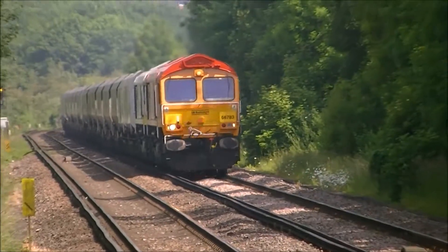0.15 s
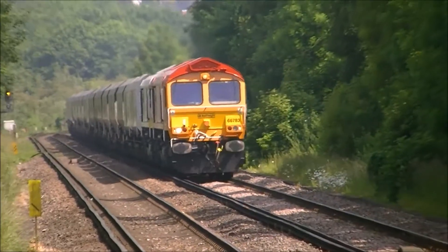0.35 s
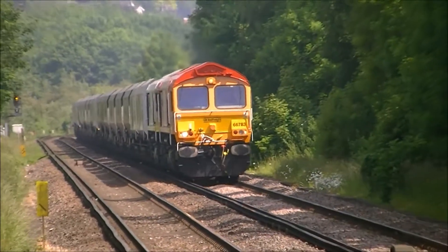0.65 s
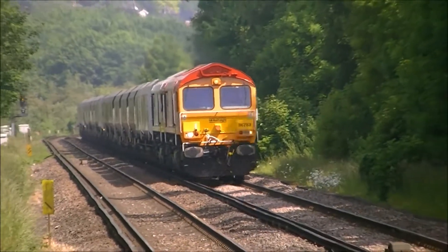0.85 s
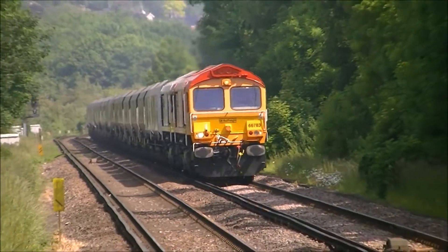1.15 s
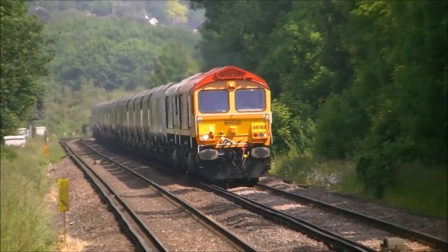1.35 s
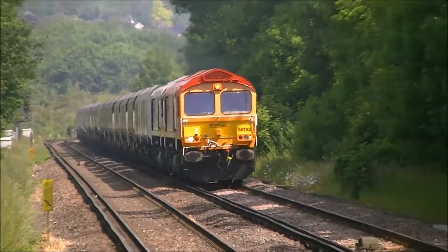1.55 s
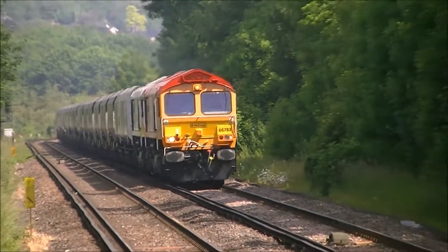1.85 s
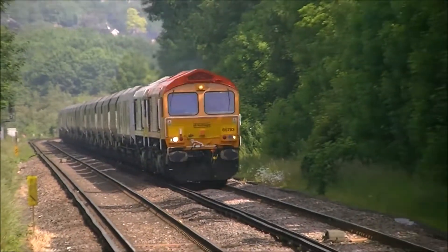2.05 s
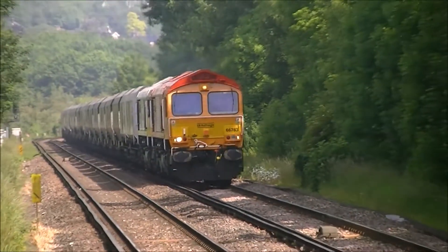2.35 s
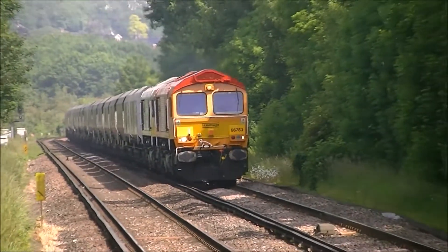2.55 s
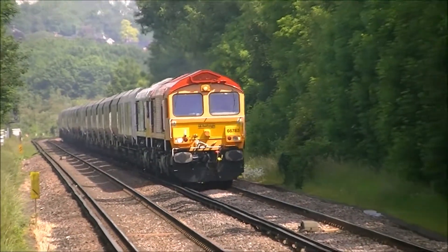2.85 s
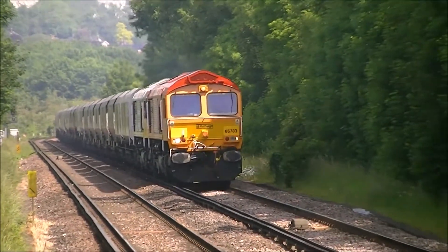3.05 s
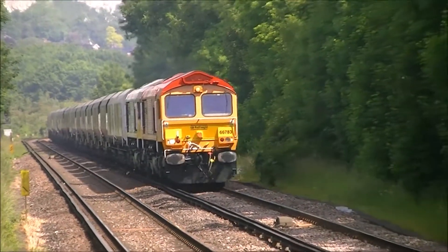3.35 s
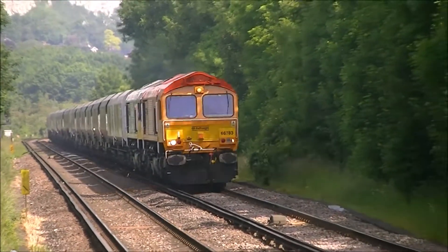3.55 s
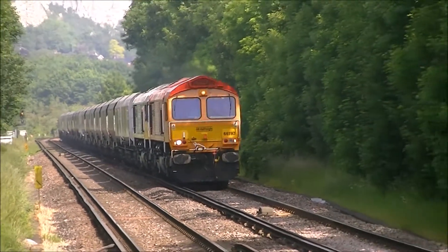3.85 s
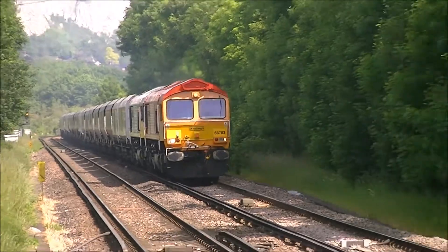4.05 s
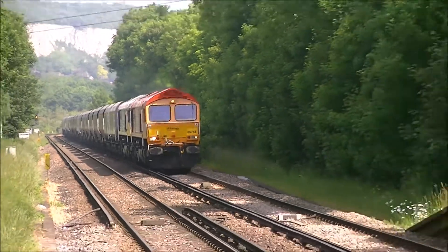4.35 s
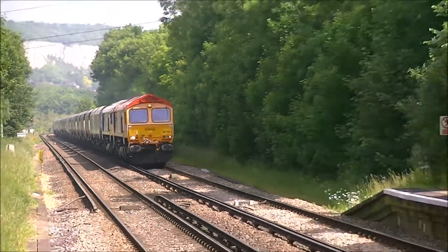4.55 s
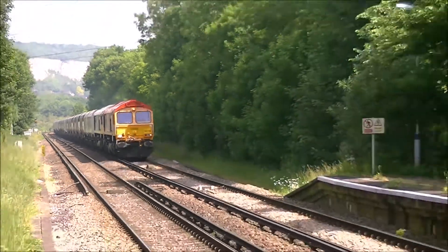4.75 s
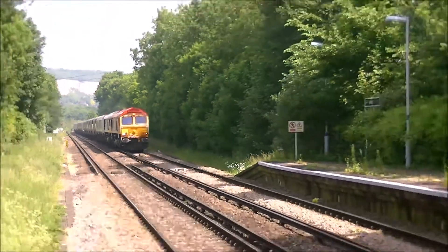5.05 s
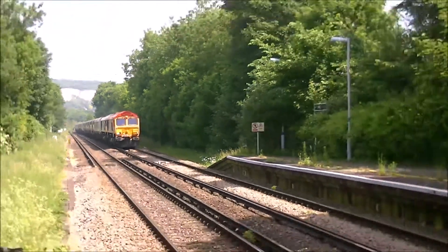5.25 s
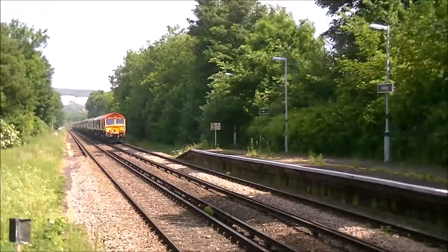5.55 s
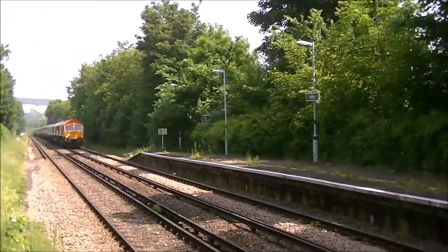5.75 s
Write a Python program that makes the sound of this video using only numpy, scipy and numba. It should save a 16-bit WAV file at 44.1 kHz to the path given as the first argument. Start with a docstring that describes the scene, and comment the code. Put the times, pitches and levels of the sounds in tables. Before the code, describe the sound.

A roughly six-second outdoor stereo take from a country platform. Steady soft leaf and far-traffic noise and very faint high hiss lie under a distant freight train, whose smooth, flickering rolling roar starts quiet and grows throughout, gaining treble as it nears; it never passes. A small bird, slightly right and softened by trees, sings from the start: thin gliding whistles, hooks and low falling syllables, a tiny chip rattle around 1.8-2.0, then a bright rapid trill of nine falling sweeps from 2.5 to 3.3. A few fainter whistles follow until 3.9, then almost nothing. Dry, close cracks occur at 3.5 and, strongest, 4.1, with tiny ticks between. At 5.4 a brassy low horn note blasts, followed at 5.66 by a slightly higher one until about 5.8, each short, rich and buzzy, starting sharp in pitch. They echo off trees about 0.2 seconds later while automatic gain squashes everything.

```python
"""A diesel freight train approaches a country station along a tree-lined cutting, heard from the platform.
From the start its roar, shaped noise, grows over leaves and hiss while a small bird sings gliding whistles.
Very short chips rattle at 1.8 s, falling sweeps trill from 2.5 s, and dry noise ticks crack from 3.5 s.
At 5.4 s a two-tone air horn, two stacks of partials, blasts, echoes off the trees and drives
the camera's gain control down."""
import sys
import numpy as np
from scipy import signal
from scipy.fft import rfft, irfft
from scipy.io import wavfile
from scipy.ndimage import uniform_filter1d, map_coordinates
from numba import njit

SR = 44100
rng = np.random.default_rng(int(sys.argv[2]) if len(sys.argv) > 2 else 0)


def store_pcm(level_fs):
    """Save levels as 16-bit WAV."""
    pcm = np.round(np.clip(level_fs, -1, 1) * 32767).astype(np.int16)
    wavfile.write(sys.argv[1], SR, np.atleast_2d(pcm).T)


N = 259749  # samples, 5.89 s


def undb(db):
    """Decibels to gain."""
    return 10 ** (np.asarray(db) / 20)


def level(x, db):
    """Scale to an rms level."""
    return x * undb(db) / np.sqrt(np.mean(x ** 2))


def shape(x, table):
    """Gain in dB of a (pitch_hz, level_db) table at each frequency bin of x."""
    hz, db = np.transpose(table)
    bin_hz = np.fft.rfftfreq(x.shape[-1], 1 / SR)
    return np.interp(np.log(bin_hz + 1), np.log(hz), db)


def walk(rate):
    """Random levels, each held 1 / rate seconds and smoothed twice; their spread is near 1."""
    hold = int(SR / rate)
    steps = np.repeat(rng.standard_normal(N // hold + 1), hold)
    return 1.09 * uniform_filter1d(uniform_filter1d(steps, hold), hold)[:N]


def pair(side_db):
    """Stereo noise: a part shared by both ears, and a part that is opposite left and right."""
    mid, side = rng.standard_normal((2, N))
    return np.array([mid + undb(side_db) * side, mid - undb(side_db) * side])


def trees(x, gap_s, rise_s, t60_s, damp_hz, wet_db, side_db):
    """Scatter from trunks and leaves: after a gap, noise that swells and dies, duller than the source."""
    t = np.maximum(np.arange(SR) / SR - gap_s, 0)
    tail = pair(side_db)[:, :SR] * (1 - np.exp(-t / rise_s)) * undb(-60 * t / t60_s)
    tail = signal.lfilter(*signal.butter(1, damp_hz, fs=SR), tail)
    tail = tail * undb(wet_db) / np.sqrt(np.sum(tail[0] ** 2))
    return signal.fftconvolve(x[None], tail, axes=1)[:, :N]


def causal(orders, count=256):
    """Phase of each partial when a sharp puff of air rings the bell (minimum phase)."""
    k, db = np.transpose(orders)
    log_gain = np.log(undb(np.interp(np.arange(count + 1) * k[-1] / count, k, db)))
    mirrored = np.r_[log_gain, log_gain[-2:0:-1]]
    phase = -np.imag(signal.hilbert(mirrored))
    return phase[np.round(k * count / k[-1]).astype(int)]


def add(out, rows, orders, fade_s):
    """Add a stack of partials that follows a (time_s, pitch_hz, level_db, treble_loss) curve."""
    s, hz, db, *loss = np.transpose(rows)
    i = np.arange(max(int(s[0] * SR), 0), min(int((s[-1] + fade_s) * SR), N))
    t = i / SR
    phase = 2 * np.pi * np.cumsum(np.interp(t, s, hz)) / SR
    k, gain = np.array(orders)[:, :1], undb(np.array(orders)[:, 1:])
    gain = gain / np.sqrt(np.sum(gain ** 2) / 2)
    if loss:  # dB per octave above the first partial
        gain = gain * undb(-np.interp(t, s, loss[0]) * np.log2(k))
    tone = np.sum(gain * np.cos(k * phase + causal(orders)[:, None]), axis=0)
    fade = np.clip(np.minimum(t - s[0], s[-1] + fade_s - t) / fade_s, 0, 1)
    out[i] += tone * np.sin(fade * np.pi / 2) ** 2 * undb(np.interp(t, s, db))


def hush(table, db, side_db):
    """Steady smooth noise of a given colour."""
    noise = pair(side_db)
    return level(irfft(rfft(noise) * undb(shape(noise, table)), N), db)


def train():
    """Rolling roar in half-octave bands that swell and flicker; air steals the treble while it is far."""
    # colour of the roar at 5.49 s: pitch_hz [Hz], level_db [relative dB per Hz]
    roar_colour = [(18, -76), (30, -75.5), (117, -43.5), (347, -18), (428, -11), (663, -3), (895, -8),
                   (1050, 3), (1210, -7.5), (1520, -8.5), (1710, -7.5), (2010, -7), (2530, -15),
                   (3190, -13.5), (7500, -30), (9750, -39.5), (16500, -120)]
    # ringing of rails and wheels: pitch_hz [Hz], width_hz [Hz], level_db [relative dB]
    rail_rings = [(620, 79, -19), (1005, 210, -5.5), (1507, 95, 4.5), (2868, 170, -5), (3900, 53, -12)]
    growth_db = 1.97 * (np.arange(N) / SR - 5.49)  # dB, zero about when the horns sound
    noise = pair(-17.5)
    f = np.fft.rfftfreq(N, 1 / SR)
    ring_power = sum(undb(db) ** 2 / (1 + (2 * (f - hz) / width) ** 2) ** 2 for hz, width, db in rail_rings)
    roar_power = undb(shape(noise, roar_colour)) ** 2
    bins = rfft(noise) * np.sqrt(roar_power + undb(-10.0) * ring_power)
    bins = bins / np.sqrt(np.mean(irfft(bins, N) ** 2))
    out, swell = 0, walk(1.823)  # one slow swell shared by all bands
    for step in range(15):
        half_octaves = 2 * np.log2((f + 1) / 120) - step
        if step == 0:  # the lowest band keeps everything below it
            half_octaves = np.maximum(half_octaves, 0)
        band = irfft(bins * np.clip(1 - np.abs(half_octaves), 0, 1), N)
        air = 120 * 2 ** (step / 2) / 9000  # higher bands grow faster
        flicker_db = 2.07 * swell + 1.47 * walk(3.86) + 1.5 * walk(11)
        out = out + band * undb(-37 + (1 + air) * growth_db + flicker_db)
    return out


def valley():
    """Leaves and far traffic: steady noise, loudest in the middle of the range."""
    # pitch_hz [Hz], level_db [relative dB per Hz]
    valley_colour = [(18, -86), (30, -63), (234, -21), (551, -4.5), (1030, -10), (1330, -9.5), (1520, -7.5),
                     (2530, -13), (4720, -19), (6840, -25), (7500, -39), (9750, -67), (16500, -120)]
    return hush(valley_colour, -52.5, -14.0)


def preamp_hiss():
    """Faint steady electronic noise, strongest near 11 kHz."""
    # pitch_hz [Hz], level_db [relative dB per Hz]
    hiss_colour = [(3000, -19), (7000, -5), (9000, -0.5), (10700, 5.5), (11100, 9.5), (11500, 4),
                   (13500, 1.5), (15000, -11), (16000, -31)]
    return hush(hiss_colour, -77.5, -21)


def bird():
    """Slightly unsteady whistles, sweeps and chips, smeared by the trees."""
    # shapes of a sweep, the faint rise before it, and a chip:
    # time_s [s from the middle], pitch_hz [Hz], level_db [dB relative to the note]
    sweep_curve = [(-.014, 5880, -2), (-.008, 5874, -1.5), (.004, 4590, -0.5), (.012, 4100, -7),
                   (.024, 3577, -12.5)]
    grace_curve = [(-.034, 5260, -29), (-.030, 5835, -38), (-.024, 5700, -8.5), (-.020, 6140, -16.5)]
    chip_curve = [(-.003, 7020, -8), (0, 5610, -1.5), (.004, 4400, -9)]
    # rattle of very short chips: middle_s [s], level_db [relative dB]
    rattle_chips = [(1.83, -43), (1.854, -39), (1.884, -41), (1.91, -37.5), (1.941, -38.5), (1.963, -37),
                    (1.995, -49)]
    # nine sweeps: first middle and spacing in s, then level and gain per sweep in dB
    trill = [(2.512 + k * .0963, -28.5 + k * 0.1) for k in range(9)]
    notes = [(note, .007) for note in syllables()]  # each with its fade in s
    forms = ((grace_curve, trill, .003), (sweep_curve, trill, .005), (chip_curve, rattle_chips, .001))
    for form, table, fade in forms:
        notes += [(np.array(form) + [s, 0, db], fade) for s, db in table]
    song = np.zeros(N)
    for note, fade in notes:
        add(song, note, [(1, 0)], fade)  # a single partial: a pure whistle
    # a small fast random timing jitter makes the pitch waver and thickens the whistles
    song = map_coordinates(song, [np.arange(N) + 1.3 * walk(150)], order=3)
    song = song * undb(-2.5 + 1.7 * walk(90))
    close = trees(song, 0.00096, 0.0008, 0.2, 11000, -2.63, -15.5)
    return song + close + trees(song, 0.023, 0.02, 0.5, 9800, -9.5, -16.5)


def syllables():
    """Every hook, slur, fall and rise of the bird as a (time_s, pitch_hz, level_db) curve."""
    # a flick up to the top, then a droop:
    # start_s, length_s [s], from_hz, top_hz, end_hz [Hz], level_db [relative dB]
    hook_notes = [(.545, 0.14, 7000, 7370, 6780, -44.5), (0.772, .13, 6980, 7360, 6940, -44),
                  (1.1, 0.083, 6250, 6540, 5560, -33), (1.707, 0.092, 6350, 6556, 5637, -31.5),
                  (3.506, .115, 6440, 7620, 6820, -38), (3.672, 0.1, 6150, 7540, 6940, -38.5),
                  (3.821, 0.11, 6300, 7670, 6830, -43)]
    # loudness along a hook: share [0-1 of its length], level_db [dB relative to the hook]
    hook_loudness = [(0, 0.5), (.12, -7), (.55, -1), (.99, -0.5)]
    # two straight glides, loudest at the turn:
    # start_s, turn_s, end_s [s], from_hz, turn_hz, end_hz [Hz], level_db [relative dB]
    slur_notes = [(.001, .004, .03, 4700, 4730, 4650, -49), (.004, 0.035, 0.058, 7000, 5280, 5230, -35),
                  (.055, .085, .11, 5600, 5480, 5200, -45.5), (0.115, .128, 0.15, 4965, 4905, 4600, -35),
                  (0.198, .205, 0.23, 4935, 4890, 4570, -33), (.25, 0.268, 0.36, 5000, 5310, 4680, -43.5),
                  (0.35, 0.421, 0.52, 7830, 7090, 6470, -43), (.95, 0.977, 1.04, 4990, 4856, 4530, -29),
                  (1.221, 1.251, 1.254, 4825, 4605, 4800, -31),
                  (1.377, 1.404, 1.435, 4990, 4625, 5030, -30.5),
                  (1.544, 1.565, 1.6, 4840, 4668, 4840, -28),
                  (1.998, 1.997, 2.027, 5200, 5330, 5280, -28.5),
                  (2.014, 2.027, 2.03, 5540, 5404, 5780, -26.5),
                  (2.177, 2.199, 2.364, 7430, 7260, 7400, -32.5),
                  (2.253, 2.253, 2.29, 2590, 2600, 2680, -44.5), (2.4, 2.42, 2.47, 4050, 4235, 4390, -33),
                  (3.354, 3.386, 3.49, 7380, 6130, 6490, -30.5), (4.494, 4.536, 4.7, 6930, 6870, 6960, -59),
                  (4.76, 4.778, 4.9, 6910, 6660, 6000, -57)]
    # low falling and rising syllables: start_s [s], pitch_hz [Hz at first], level_db [relative dB]
    fall_notes = [(1.279, 4280, -35.5), (1.445, 4300, -34.5), (1.61, 4280, -32.5), (2.075, 3795, -37)]
    rise_notes = [(.5, 4140, -35), (.722, 4120, -36.5)]
    # their shapes: time_s [s from start], pitch_ratio [times the pitch], level_db [dB relative to the note]
    fall_curve = [(-.006, 1.06, -9), (0, 0.99, -7), (.022, .9, -1), (.045, .775, -11)]
    rise_curve = [(0, 1, -12), (.021, 1.04, -0.2), (.031, 1.14, -10)]
    flick_s, droop_power = .011, 1.7
    notes = []
    for s, length, from_hz, top_hz, end_hz, db in hook_notes:
        t = np.r_[0, np.linspace(flick_s, length, num=9)]
        droop = ((t[1:] - flick_s) / (length - flick_s)) ** droop_power
        hz = np.r_[from_hz, top_hz + (end_hz - top_hz) * droop]
        loudness_db = db + np.interp(t / length, *np.transpose(hook_loudness))
        notes.append(np.c_[s + t, hz, loudness_db])
    for row in slur_notes:
        loudness_db = row[6] + np.array([-9.5, 0, -11])  # dB at start, turn and end
        notes.append(np.c_[np.sort(row[:3]), row[3:6], loudness_db])
    for form, table in ((fall_curve, fall_notes), (rise_curve, rise_notes)):
        notes += [np.array(form) * [1, hz, 1] + [s, 0, db] for s, hz, db in table]
    return notes


def swells():
    """Faint hissy puffs of band noise in the treble, with a quick random flutter."""
    # start_s, end_s [s], low_hz, high_hz [Hz], level_db [dB before the swell shape and flutter]
    treble_puffs = [(0.214, 0.377, 5260, 6960, -55.5), (1.31, 1.404, 7200, 9400, -67),
                    (1.42, 1.52, 7300, 8970, -67), (1.538, 1.677, 7160, 9000, -71)]
    out, t = 0, np.arange(N) / SR
    for start, end, low_hz, high_hz, db in treble_puffs:
        band_filter = signal.butter(3, [low_hz, high_hz], "bandpass", fs=SR, output="sos")
        band = signal.sosfilt(band_filter, pair(-13.5))
        rise_and_fall = np.sin(np.pi * np.clip((t - start) / (end - start), 0, 1))
        out = out + level(band, db) * rise_and_fall
    return out * undb(1.2 * walk(70))


def ticks():
    """Dry cracks close to the camera, each a wide band of noise that dies at once."""
    # start_s [s], peak_db [dB], pitch_hz [Hz, inside the band], t60_s [s to die by 60 dB]
    crack_rows = [(3.498, -22.5, 3000, .006), (3.668, -42, 4500, .006), (3.760, -43, 4000, .006),
                  (3.814, -42, 4500, .005), (4.1228, -16, 3700, .012)]
    out, t = np.zeros(N + 2000), np.arange(2000) / SR
    for s, db, hz, t60 in crack_rows:
        noise = rng.standard_normal(len(t))
        band = signal.butter(3, [.42 * hz, 1.6 * hz], "bandpass", fs=SR)
        crack = signal.lfilter(*band, noise * undb(-60 * t / t60))
        first = int(s * SR)
        out[first:first + len(t)] += undb(db) * crack / np.max(np.abs(crack))
    out = out[:N]
    return out + trees(out, 0.001, .002, 0.027, 4700, -21, 7)


def horns():
    """Two air horns in turn; the platform and near trees blur them and a far bank throws them back."""
    # one row a horn: start_s, attack_s, full_s (fully loud at), shut_s (valve shuts at) [s],
    # pitch_hz [Hz], level_db, first_puff_db [dB], sharp_at_first [0-1 of pitch], wobble_hz [Hz],
    # sag [0-1 of pitch], stutter [treble loss, dB per octave]
    horn_rows = [(5.415, .016, 5.478, 5.575, 312.6, 4.5, -3.5, .068, 27.5, 0.04, 1.5),
                 (5.661, .006, 5.69, 5.812, 355.3, 14.5, -11.5, .047, 3.4, 0.03, -1.2)]
    # partials of the low and the high horn, straight between rows: multiple [of pitch], level_db [relative dB]
    low_partials = [(1, -40), (2, -4), (3, -8), (4, -1), (5, -2), (6, -8), (7, -9), (8, -18), (9, -10),
                    (10, -20), (13, -16), (18, -16), (22, -23), (26, -39), (30, -32), (33, -36), (37, -49),
                    (48, -56)]
    high_partials = [(1, -35), (2, -16), (3, 0), (4, -10), (5, -13), (6, -10), (7, -18), (8, -13), (9, -20),
                     (12, -21), (13, -26), (14, -20), (18, -26), (20, -38), (24, -35), (25, -40), (32, -45),
                     (42, -66)]
    blast = np.zeros(N)
    for row, orders in zip(horn_rows, (low_partials, high_partials)):
        add(blast, blow(*row), every(orders), .003)
    # puffs come a few microseconds early or late and turbulent air roughens them
    blast = -map_coordinates(blast, [np.arange(N) + .2 * walk(330)], order=3)
    bell = signal.butter(2, [700, 7000], "bandpass", fs=SR, output="sos")
    blast = blast + signal.sosfilt(bell, blast * undb(-26) * rng.standard_normal(N))
    platform = trees(blast, .004, .004, .1, 4000, -19, -12)
    near = trees(blast, .015, .01, .3, 800, -24, -14) + trees(blast, .02, .02, .5, 2500, -29, -12)
    far_bank = trees(blast, 0.1946, .02, 0.51, 5200, -19, -9)
    return blast + platform + near + far_bank


def blow(start, attack, full, shut, hz, db, first_db, sharp, wobble_hz, sag, stutter_db):
    """One blast as a curve for add: sharp and dull at first, dipping flat as the valve shuts."""
    # dying away: after_s [s after the valve shuts], level_db [dB], treble_loss [dB per octave]
    valve_closing = [(.022, -4.5, 0.5), (.04, -10, 6.5), (.086, -14.5, 4.5)]
    settle_s, onset_db, onset_dull = 0.019, -13.5, 15  # pitch settling; first level; treble loss, dB per octave
    after, shut_db, dull = np.transpose(valve_closing)
    t = np.arange(start, shut + after[-1], .001)
    late = np.maximum(t - start - attack, 0)
    bend = sharp * np.exp(-late / settle_s) * np.cos(2 * np.pi * wobble_hz * late)
    bend = bend * np.interp(t, [start, start + attack], [.5, 1])
    bend = bend - sag * np.interp(t, np.r_[shut, shut + after[:2]], [0, 1, 0])
    marks = np.r_[start, start + attack, full, shut, shut + after]
    loudness_db = db + np.interp(t, marks, np.r_[onset_db, first_db, 0, 0, shut_db])
    # the air catches 59.5 times a second until the horn speaks fully
    pulses = np.sin(np.pi * 59.5 * (full - t)) ** 4
    catch = stutter_db * np.minimum(late / settle_s, 1) * (t < full) * pulses
    treble_loss = np.interp(t, marks, np.r_[onset_dull, 0, 0, 0, dull]) + catch
    return np.c_[t, hz * (1 + bend), loudness_db, treble_loss]


def every(orders):
    """Fill in all multiples between the listed ones."""
    k = np.arange(1, orders[-1][0] + 1)
    return np.c_[k, np.interp(k, *np.transpose(orders))]


def scene():
    """All sources, left and right."""
    bird_pan = undb([[-0.425], [0.425]])  # slightly to the right
    background = train() + valley() + preamp_hiss()
    return background + bird() * bird_pan + swells() + ticks() + horns()


@njit
def ride(loud, attack, release, top, power):
    """Gain that falls as the level passes a threshold: quick down, slower up."""
    gain, followed = np.empty(len(loud)), 0.
    for i in range(len(loud)):
        followed += (loud[i] - followed) * (attack if loud[i] > followed else release)
        gain[i] = min(1., top / (followed + 1e-9)) ** power
    return gain


def record(dry):
    """Two unlike microphones, gain control on the loudness of the last 6 ms, then bass and top cuts."""
    # the two microphones differ in colour: pitch_hz [Hz], left_minus_right_db [dB]
    microphone_colours = [(100, 0), (170, -2), (290, -2.7), (500, -2.5), (850, -2), (1440, -1.5),
                          (2440, -.2), (4150, -.7), (7050, .2)]
    padded = np.pad(dry, ((0, 0), (0, SR // 2)), mode="reflect")
    half_db = shape(padded, microphone_colours) / 2
    x = irfft(rfft(padded) * undb([half_db, -half_db]), padded.shape[1])[:, :N]
    power = uniform_filter1d(np.mean(x ** 2, axis=0), size=265, origin=132)
    loud = np.sqrt(np.maximum(power, 0))
    # 1.4 ms down, 2 ms up, above -20 dB
    x = x * ride(loud, 1 / (0.0014 * SR), 1 / (0.002 * SR), undb(-20.0), 0.93)
    x = signal.sosfilt(signal.butter(2, 90, "highpass", fs=SR, output="sos"), x)
    return signal.sosfilt(signal.ellip(8, .2, 70, 15700, fs=SR, output="sos"), x)


dry = scene()
out = record(dry)
store_pcm(out)
```